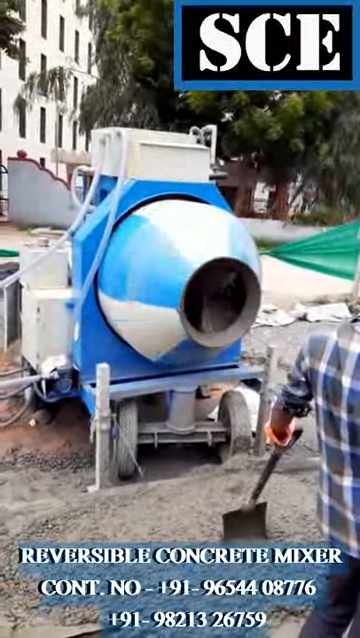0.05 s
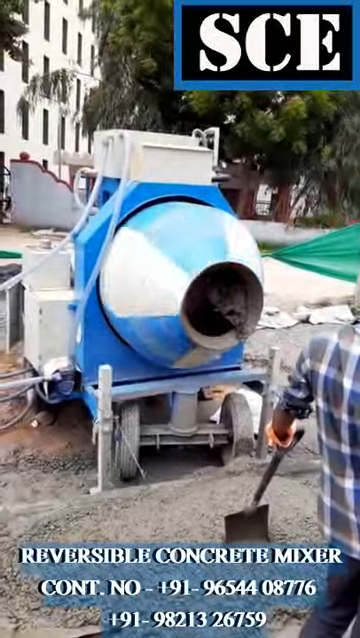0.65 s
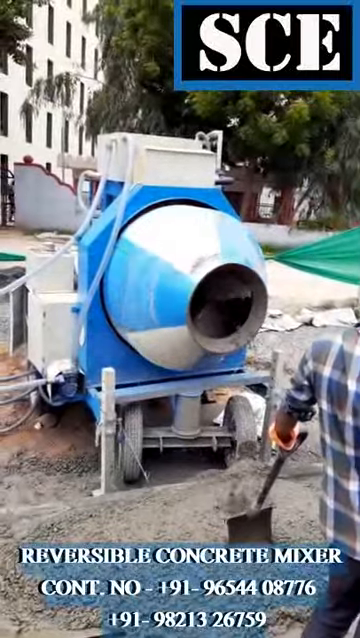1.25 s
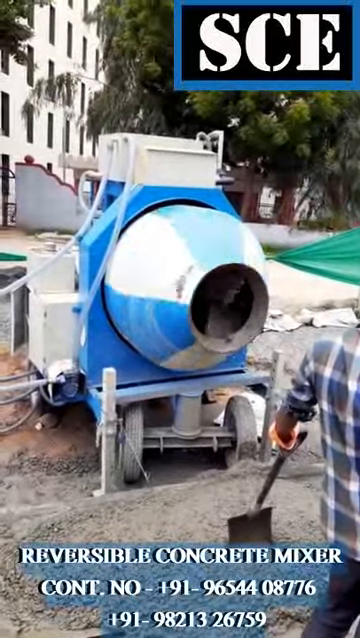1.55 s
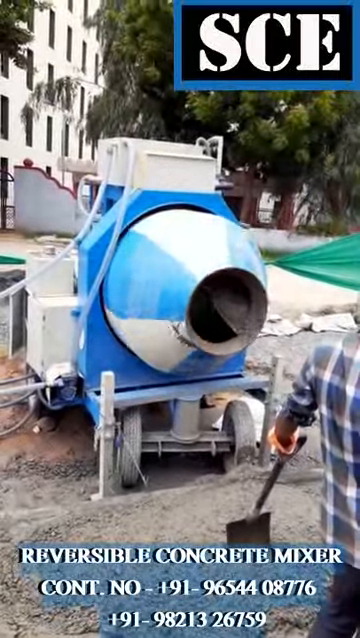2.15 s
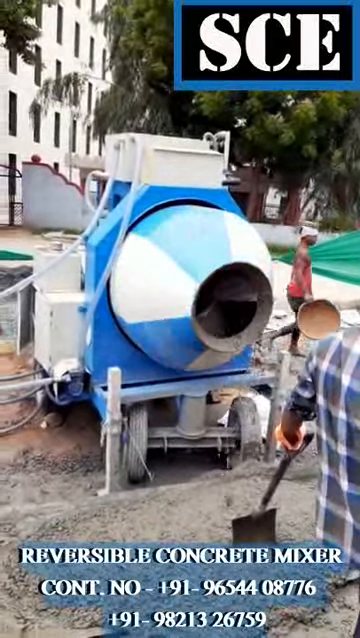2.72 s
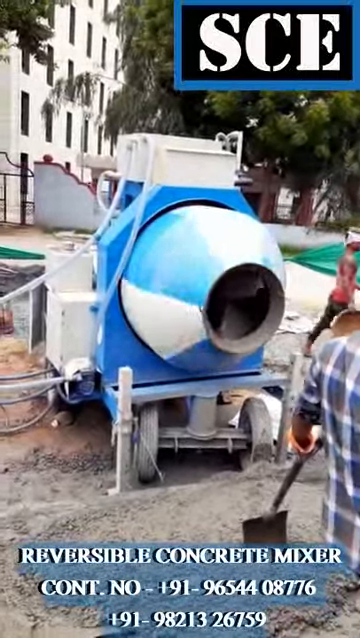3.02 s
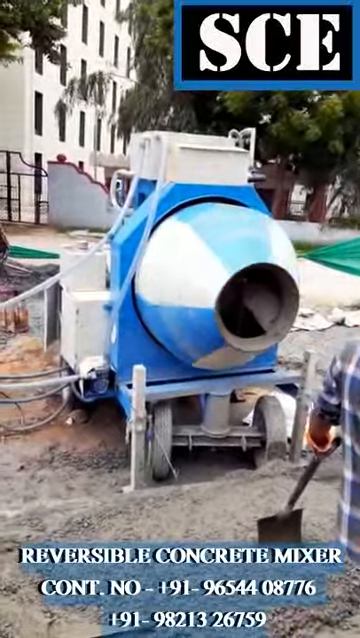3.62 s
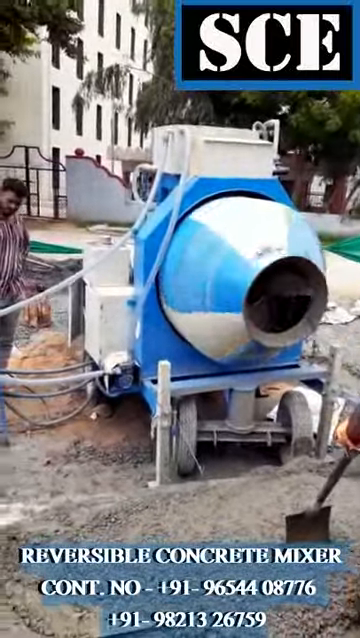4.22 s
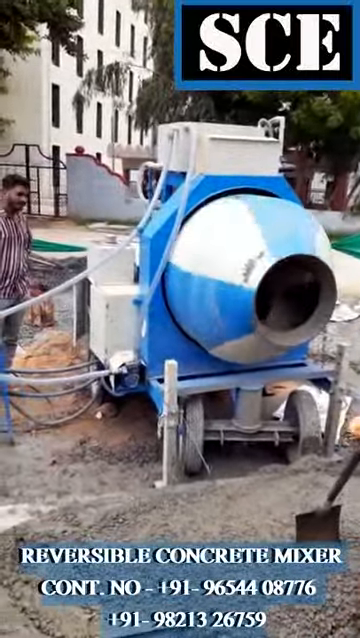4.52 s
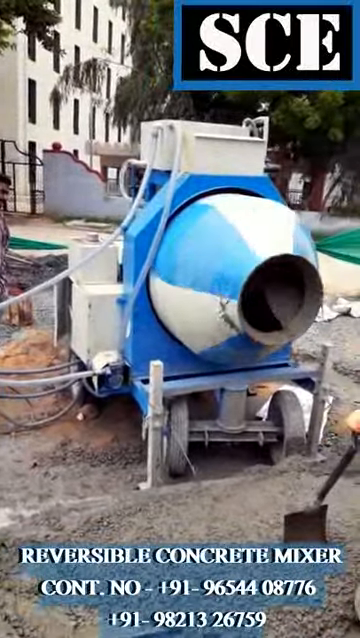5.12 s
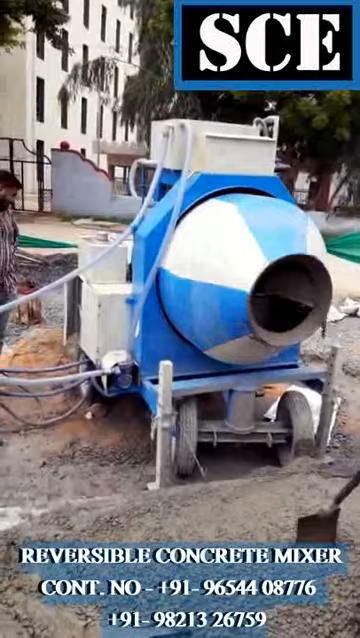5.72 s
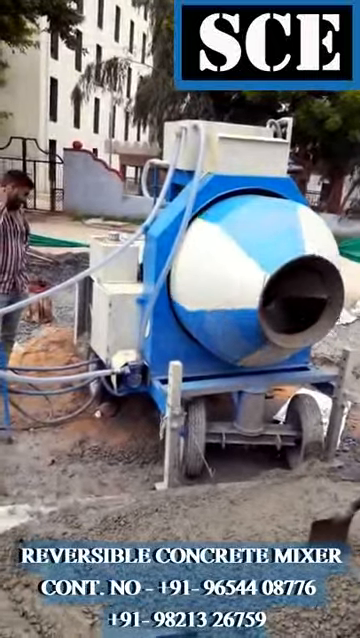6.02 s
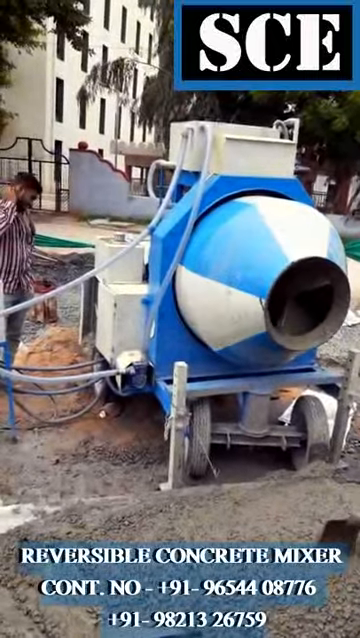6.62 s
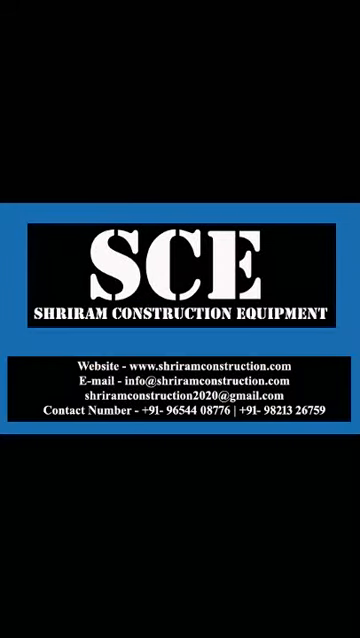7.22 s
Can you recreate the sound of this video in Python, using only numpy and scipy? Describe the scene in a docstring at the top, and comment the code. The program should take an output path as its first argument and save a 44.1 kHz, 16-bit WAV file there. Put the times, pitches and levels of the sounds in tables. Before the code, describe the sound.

A concrete mixer is already running close by outdoors, its one-cylinder diesel thudding, knocking and ticking in a fast, even rhythm. Wet gravel rumbles and slides in the steel drum, with frequent short rasps across the blades. The drum groans on a wavering low note, swelling most at about 2.4 and 4.5 seconds, and a roller gives faint, high squeaks. Stones patter over the rim around 1 second, repeatedly between 2.6 and 4.3, and again after 5, and the steel rings now and then. Dull thumps land near 0.5, 1.3 and 1.8 seconds, with the strongest knock at 3.4 and a sharp clink at 4. From about 5 seconds the tumbling eases and the engine knocks slightly harder. A shovel clacks and scrapes through gravel, most clearly at 5.9 and 6.5 seconds. Everything cuts off abruptly just before 6.9 seconds, leaving silence.

```python
"""A concrete mixer turns wet gravel in its steel drum on a building site.
The stones tumble, knock on the wall, slide off the blades and spill over the rim, making the steel ring.
A one-cylinder diesel drives it, thudding and ticking in every cycle. The drum groans on a wavering low
note that swells now and then, and a roller squeaks. Near the end a shovel scrapes through gravel nearby.
Everything cuts off shortly before seven seconds."""
import sys
import numpy as np
from scipy import signal
from scipy.fft import rfft, irfft, next_fast_len
from scipy.io import wavfile
from scipy.ndimage import map_coordinates

SR = 44100
rng = np.random.default_rng(int(sys.argv[2]) if len(sys.argv) > 2 else 0)


def to_wav(s):
    """Save 16-bit WAV."""
    ch = np.atleast_2d(s).T  # columns
    pcm = np.round(np.clip(ch, -1, 1) * 32767)  # PCM
    wavfile.write(sys.argv[1], SR, pcm.astype(np.int16))


N = 328986
TIME = np.arange(N) / SR


def amp(db):
    """Turn decibels into a number to multiply by."""
    return 10 ** (np.asarray(db) / 20)


def unit(x):
    """Scale a sound to an average (rms) strength of 1."""
    return x / np.sqrt(np.mean(x ** 2) + 1e-20)


def along(points, hz):
    """Read between the rows of a (pitch_hz, value) table, on a log scale of pitch."""
    pitches, values = np.transpose(points)
    return np.interp(np.log(hz + 1), np.log(pitches + 1), values)


def curve(points):
    """Join (time_s, value) rows with straight lines, one value per sample."""
    return np.interp(TIME, *np.transpose(points))


def wobble(rate):
    """A smooth curve through `rate` random values a second."""
    values = rng.standard_normal(int(N * rate / SR) + 4)
    coarse = TIME[::64]
    return np.interp(TIME, coarse, map_coordinates(values, [coarse * rate]))


def burst(age, attack_s, decay_s):
    """The loudness of a hit: a quick rise, then a dying away."""
    age = np.maximum(age, 0)
    return (1 - np.exp(-age / attack_s)) * np.exp(-age / decay_s) * (1 + 2 * attack_s / decay_s)


def swell(peak_s, half_length_s):
    """A smooth, bell-shaped rise and fall."""
    return np.exp(-((TIME - peak_s) / half_length_s) ** 2)


def batch(start_s, length_s, attack_s, release_s):
    """The loudness of a batch of stones: it builds, holds and peters out."""
    age = TIME - start_s
    return np.clip(age / attack_s, 0, 1) * np.exp(-np.maximum(age - length_s, 0) / release_s)


def filtered(x, response):
    """Multiply each frequency f in a sound by response(f)."""
    size = next_fast_len(N + SR // 4, True)
    return irfft(rfft(x, size) * response(np.fft.rfftfreq(size, 1 / SR)), size)[..., :N]


def colour(points):
    """A filter shape drawn from (pitch_hz, gain_db) rows."""
    return lambda f: amp(along(points, f))


def resonance(hz, width):
    """A filter shape that peaks at one pitch, applied twice for steep sides."""
    return lambda f: (1j * f * width / (hz * hz - f * f + 1j * f * width)) ** 2


def resonate(x, hz, sharpness):
    """Make a short noise ring around one pitch, at strength 1."""
    b, a = signal.iirpeak(hz, sharpness, SR)
    return unit(signal.lfilter(b, a, signal.lfilter(b, a, x)))


# How alike left and right are (1 = the same): pitch_hz, likeness
LIKENESS = [(60, 0.89), (200, 1), (400, 0.66), (700, 0.71), (1400, 0.36), (2200, 0.44), (4000, 0.17),
            (12000, 0.16)]
def spread(pair, response):
    """Turn two unrelated noises into filtered stereo of strength 1, most alike in the bass."""
    def shares(f):
        angle = np.arccos(np.clip(along(LIKENESS, f), -1, 1)) / 2
        return response(f) * np.array([np.cos(angle), np.sin(angle)])
    mid, side = filtered(pair, shares)
    return unit(np.array([mid + side, mid - side]))


def rush(response):
    """Smooth, filtered stereo noise of strength 1."""
    return spread(rng.standard_normal((2, N)), response)


def stones(per_s, scatter_db, decay_s):
    """Stones of uneven size hit at random moments, each a tiny burst of noise."""
    hits = (rng.random(N) < per_s / SR) * amp(scatter_db * np.minimum(rng.exponential(size=N), 3))
    power = signal.lfilter([1], [1, -np.exp(-2 / (decay_s * SR))], hits ** 2)
    return np.sqrt(power) * rng.standard_normal((2, N))


def steel(spacing_hz):
    """A bumpy filter shape: the drum rings at many pitches close together."""
    bumps_db = 2.3 * rng.standard_normal(size=1024)
    return lambda f: amp(np.interp(f / spacing_hz, np.arange(len(bumps_db)), bumps_db))


def on_steel(hits, tone, metal):
    """Give hits a tone colour and the ring of the metal, in stereo."""
    return spread(hits, lambda f: colour(tone)(f) * metal(f))


# Tone of the blade's clack, and of fine grit (also in spills): pitch_hz, gain_db
BLADE_TONE = [(500, -24.5), (1200, -11), (2000, -4.5), (3500, -15.5), (6000, -22), (9000, -12.5),
              (15000, -31.5)]
GRIT_TONE = [(3000, 1), (5500, 1), (7100, -3), (8500, 3), (10300, -1), (12300, -0.5), (15000, -14.5)]
# Shovel strokes: start_s, strike_db, scrape_db, length_s
SHOVEL_STROKES = [(5.302, -31, -47, 0.091), (5.91, -15, -30, 0.11), (6.464, -14, -25.5, 0.12),
                  (6.786, -28, -34, .05)]
def shovel():
    """The blade clacks on the gravel and grinds on through it."""
    strike, scrape = np.zeros((2, N))
    for start, strike_db, scrape_db, length in SHOVEL_STROKES:
        strike += amp(strike_db) * burst(TIME - start, attack_s=.0015, decay_s=.008)
        position = 2 * (TIME - start) / length - 1  # -1 to 1 during the stroke
        scrape += amp(scrape_db) * np.sqrt(np.clip(1 - position ** 2, 0, 1))
    clack = rush(colour(BLADE_TONE))
    grind = spread(stones(1300, 1.16, .0009), colour(GRIT_TONE))
    return strike * clack + scrape * grind


# Chirps of a roller: peak_s, level_db
ROLLER_CHIRPS = [(.34, -43), (.635, -35.5), (1.15, -38), (1.3, -40), (1.43, -40), (2.88, -35.5),
                 (3.62, -42), (4.41, -39), (5.40, -35), (5.775, -32.5), (5.925, -30.5), (6.115, -30)]
def roller(pitch_hz=8480, waver_hz=130, gain_db=1.5):
    """A roller whispers unevenly and gives a thin squeak now and then."""
    chirps = sum(amp(db + gain_db) * swell(peak, half_length_s=.016) for peak, db in ROLLER_CHIRPS)
    whisper = amp(-63 + 5.3 * wobble(18))
    pitch = pitch_hz + waver_hz * wobble(120)
    tone = np.sqrt(2) * np.sin(2 * np.pi * np.cumsum(pitch) / SR)
    return chirps * tone + whisper * rush(resonance(pitch_hz, 250))


def last_hit(cycle, speed, place):
    """For a hit at `place` (0 to 1) in each engine cycle: its number and the seconds since it."""
    count, fraction = np.divmod(cycle - place + 1, 1)
    return count.astype(int), fraction / speed


# Tones in the engine's hum: multiple_of_cycle_rate, level_db
ENGINE_HUM = [(6, -40.5), (7, -52), (8, -38), (9, -50), (10, -40), (13, -45), (15, -43), (27, -47),
              (29, -45), (35, -48), (38, -49), (69, -48)]
# Gusts of exhaust and intake: place_in_cycle, pitch_hz, level_db, decay_s
GAS_PUFFS = [(.14, 178, -20.5, .007), (.19, 207, -21, .008), (.535, 208, -30, .014),
             (.82, 186, -25.5, .011), (.885, 370, -27, .009), (.925, 328, -24, .008)]
def exhaust(cycle, speed, hum_db=-1, throb_place=.2, low_cut_hz=105):
    """The engine hums, and each gust of gas thuds in the pipes, never twice quite alike."""
    angle = 2 * np.pi * (cycle - throb_place)
    hum = sum(amp(db + hum_db + wobble(15)) * np.cos(multiple * angle) for multiple, db in ENGINE_HUM)
    puffs = np.zeros(N)
    for place, hz, db, decay in GAS_PUFFS:
        count, age = last_hit(cycle, speed, place)
        strength, detune = rng.standard_normal(size=(2, 128))[:, count]
        tone = np.sin(2 * np.pi * hz * (1 + .005 * detune) * age)
        puffs += amp(db + .7 * strength) * burst(age, .001, decay) * tone
    puffs = filtered(puffs, lambda f: 1 - 1 / (1 + (f / low_cut_hz) ** 8))
    return np.sqrt(2) * (puffs - hum)


# Metal notes rung in each cycle: place_in_cycle, pitch_hz, level_db, decay_s
KNOCK_NOTES = [(.31, 5400, -31.5, .0016), (.315, 4910, -27, .0023), (.316, 1090, -26.5, .0065),
               (.316, 1240, -26, .0065), (.315, 1160, -25, .0025), (.318, 1370, -30, .004),
               (.37, 825, -30.5, .014), (.56, 860, -30, .008), (.2, 677, -35.5, .032),
               (.125, 5100, -39, .002)]
def knock(cycle, speed):
    """The fuel injector pings and the engine block knocks at every firing."""
    out = np.zeros((2, N))
    for place, hz, db, decay in KNOCK_NOTES:
        count, age = last_hit(cycle, speed, place)
        strength, detune, shift, skew = rng.standard_normal(size=(4, 128))[:, count]
        phase = .4 * shift + np.array([skew, -skew]) / 3  # not the same left and right
        ring = np.sqrt(2) * np.sin(2 * np.pi * hz * (1 + .006 * detune) * age + phase)
        out += amp(db + .6 * strength) * burst(age, .0005, decay) * ring
    return out


# Ticks of valves and rattling covers: place_in_cycle, pitch_hz, base_width_hz, level_db, decay_s
VALVE_TICKS = [(.39, 870, 400, -35, .014), (.559, 832, 250, -33.5, 0.0084), (.6, 5140, 1990, -32.5, 0.013),
               (.72, 4547, 2200, -32.5, .0081), (.83, 13000, 2507, -34, .007), (.97, 8800, 2000, -36, .012),
               (.125, 13000, 2990, -37.5, .004), (.62, 10500, 4000, -36, .016)]
def clatter(cycle, speed, scatter_db=2):
    """Each moving part strikes at its own place in the cycle, harder or softer every time."""
    out = np.zeros((2, N))
    for place, hz, width, db, decay in VALVE_TICKS:
        count, age = last_hit(cycle, speed, place)
        strength_db = scatter_db * rng.standard_normal(size=128)[count]
        out += amp(db + strength_db) * burst(age, .00027, decay) * rush(resonance(hz, 1.16 * width))
    return out


# Speed of the four-stroke engine: time_s, cycles_per_s
ENGINE_SPEED = [(0, 11.67), (1.7, 11.66), (3, 11.68), (4.9, 11.67), (5.3, 11.72), (5.8, 11.85),
                (6.2, 11.95), (6.9, 12.0)]
# The knock grows louder near the end, and the clatter more so: time_s, boost_db
KNOCK_BOOST = [(0, 0), (5.2, 0), (6.1, 1.4), (6.9, 1.7)]
# Tone of the fan and engine block: pitch_hz, gain_db
FAN_TONE = [(20, -61.5), (45, -29), (65, -10.5), (130, -12), (260, -6.5), (370, -16), (500, -11), (700, -7),
            (1200, -11.5), (2000, -16), (3000, -22), (5200, -17), (7000, -31.5), (8500, -21.5),
            (10300, -27.5), (12500, -25), (15000, -35.5)]
def engine():
    """The diesel thuds, knocks and ticks in step, over the steady rush of its fan and block."""
    speed = curve(ENGINE_SPEED)
    boost_db = curve(KNOCK_BOOST)
    cycle = np.cumsum(speed) / SR  # cycles run so far
    fan = amp(-29 + .87 * wobble(11)) * rush(colour(FAN_TONE))
    thuds = exhaust(cycle, speed)
    knocks = amp(boost_db) * knock(cycle, speed)
    ticks = amp(1.42 * boost_db) * clatter(cycle, speed)
    return fan + thuds + knocks + ticks


# Low notes of the rubbed drum: peak_s, level_db, pitch_hz, half_length_s
DRUM_HUMS = [(.27, -31, 371, .1), (.53, -31.5, 364, 0.18), (.69, -34, 147, .1), (1.397, -32.5, 390, 0.063),
             (2.0, -34, 150, .049), (3.737, -31, 149.5, .06), (4.37, -32, 147.6, 0.14),
             (4.92, -36, 370, .08)]
def hums():
    """The sliding load rubs the drum like a bow, so a low note swells and fades."""
    drift = .31 * wobble(20)
    out = np.zeros(N)
    for peak, db, hz, half_length in DRUM_HUMS:
        out += amp(db) * swell(peak, half_length) * np.sin(2 * np.pi * hz * (TIME - peak) + drift)
    return np.sqrt(2) * out


# One stone on the rim: start_s, level_db, pitch_hz
RIM_CLINKS = [(3.956, -19.5, 3870)]
def clinks(width_hz=1100, decay_s=.018):
    """A stone hits the steel rim, which rings briefly."""
    return sum(amp(db) * burst(TIME - start, .001, decay_s) * rush(resonance(hz, width_hz))
               for start, db, hz in RIM_CLINKS)


# Tone of pattering stones: pitch_hz, gain_db
PATTER_TONE = [(800, -13.5), (2000, 3), (2900, -4), (3550, 3), (3800, -2), (4400, -1), (5500, -19),
               (7000, -21.5), (14000, -49.5)]
# Stones spilling out: start_s, length_s, patter_db, hiss_db
STONE_SPILLS = [(0.95, 0.37, -29, -32), (1.157, 0.13, -31, -31.5), (2.584, 0.069, -28, -41),
                (2.76, 0.14, -31, -32.5), (3.315, 0.044, -23, -33.5), (3.92, 0.15, -32, -35),
                (4.075, 0.079, -25.5, -31.5), (4.28, 0.069, -28, -41.5), (5.283, 0.039, -27.5, -33.5),
                (5.779, 0.23, -32.5, -31.5)]
def spills(trickle_patter_db=-36, trickle_hiss_db=-35.5):
    """Loose stones patter over the drum's mouth: a constant trickle and larger portions."""
    patter_power, hiss_power = amp(trickle_patter_db) ** 2, amp(trickle_hiss_db) ** 2
    for start, length, patter_db, hiss_db in STONE_SPILLS:
        flow = batch(start, length, attack_s=.018, release_s=.11)
        patter_power += (amp(patter_db) * flow) ** 2
        hiss_power += (amp(hiss_db) * flow) ** 2
    clumps_db = 3 * wobble(22.08)
    metal = steel(spacing_hz=59.87)
    patter = amp(clumps_db / 2) * on_steel(stones(700, 2.6, .006), PATTER_TONE, metal)
    hiss = amp(clumps_db) * on_steel(stones(600, .94, .011), GRIT_TONE, metal)
    return np.sqrt(patter_power) * patter + np.sqrt(hiss_power) * hiss


# Moments when the steel rings: peak_s, level_db, pitch_hz, half_length_s
STEEL_RINGS = [(0.982, -22, 866, 0.013), (2.86, -28, 900, .08), (2.967, -27.5, 990, 0.14),
               (5.14, -28.5, 978, 0.091), (5.623, -25.5, 1050, 0.05), (5.96, -29.5, 940, .04)]
def rings(sharpness=11):
    """Stones rolling on the steel make it ring around one pitch."""
    out = np.zeros((2, N))
    grit = spread(stones(710, 1.9, .0027), np.ones_like)
    for peak, db, hz, half_length in STEEL_RINGS:
        near = slice(max(round((peak - 3 * half_length) * SR), 0), round((peak + 3 * half_length) * SR))
        out[:, near] += amp(db) * swell(peak, half_length)[near] * resonate(grit[:, near], hz, sharpness)
    return out


# Tone of rasping stones: pitch_hz, gain_db
RASP_TONE = [(800, -24.5), (1500, -2.5), (2400, -1.5), (2750, -16.5), (5000, -34.5)]
# Stones dragging over a mixing blade: start_s, length_s, level_db, pitch_hz
BLADE_SCRAPES = [(0.103, 0.032, -25.5, 2080), (0.284, 0.15, -26.5, 1980), (0.533, .025, -23.5, 2060),
                 (.6, 0.037, -27, 2000), (0.743, .045, -22.5, 2150), (1.0, .035, -23, 2100),
                 (1.09, 0.036, -25, 2000), (1.17, .05, -23, 1950), (1.366, 0.041, -20, 2150),
                 (1.43, .06, -23, 2250), (1.52, .04, -23.5, 2050), (1.602, .09, -24.5, 2030),
                 (2.315, 0.048, -26.5, 2000), (2.42, .015, -23.5, 1900), (2.468, 0.044, -21.5, 2100),
                 (2.639, 0.035, -19, 1950), (2.754, .055, -19.5, 2150), (2.858, 0.083, -25.5, 1950),
                 (3.02, 0.051, -24.5, 2000), (3.18, 0.062, -24.5, 2050), (3.384, 0.083, -25.5, 2000),
                 (3.481, .035, -23, 1950), (4.05, 0.049, -26, 2000), (4.32, 0.043, -22.5, 1900),
                 (4.432, 0.057, -23, 2200), (4.499, 0.035, -21, 2280), (4.702, 0.047, -24, 2100),
                 (4.797, 0.049, -22, 1870), (4.88, .08, -26, 2000), (5.092, 0.058, -27.5, 2000),
                 (5.632, 0.055, -29, 1900), (5.932, 0.049, -22.5, 1800)]
def scrapes(sharpness=4.1, gain_db=-.5):
    """Stones catch on a blade, judder across it with a rasp and let go."""
    out = np.zeros((2, N))
    grit = spread(stones(650, 1.3, .0035), colour(RASP_TONE))
    for start, length, db, hz in BLADE_SCRAPES:
        near = slice(round(start * SR), round((start + length) * SR) + SR // 10)
        loudness = amp(db + gain_db) * batch(start, length, attack_s=.0079, release_s=.022)
        out[:, near] += loudness[near] * resonate(grit[:, near], hz, sharpness)
    return out


# Notes of the struck drum wall: pitch_hz, level_db, decay_s
WALL_NOTES = [(205, -7, .005), (280, -1.5, .011), (367, -12.5, .004), (550, -11, .008), (665, -10, .011)]
# Heavy lumps falling: start_s, boom_db, boom_hz, knock_db
FALLING_LUMPS = [(0.526, -16.5, 109, -23), (1.261, -16, 147, -33), (1.774, -17, 157, -28),
                 (3.415, -14, 120, -10), (6.787, -23, 147.8, -26.5)]
def lumps(low_cut_hz=60):
    """A heavy lump lands: the wall knocks and the loaded drum gives a short, dull boom."""
    out = np.zeros(N)
    age = np.arange(SR // 5) / SR
    wall = sum(amp(db) * burst(age, .001, decay) * np.sin(2 * np.pi * hz * age)
               for hz, db, decay in WALL_NOTES)
    for start, boom_db, hz, knock_db in FALLING_LUMPS:
        boom = burst(age, attack_s=.0054, decay_s=.0087) * np.sin(2 * np.pi * hz * age)
        out[round(start * SR):][:len(age)] += np.sqrt(2) * (amp(boom_db) * boom + amp(knock_db) * wall)
    return filtered(out, lambda f: f ** 4 / (f ** 4 + low_cut_hz ** 4))


# The note the drum groans on: time_s, pitch_hz
GROAN_NOTE = [(0, 276.5), (1.2, 274.4), (2.1, 276), (2.42, 270), (2.85, 277.4), (4.58, 278.6),
              (4.72, 290.2), (4.9, 278.6), (5.9, 277.8), (6.08, 305)]
# Moments when the groan swells: peak_s, level_db, half_length_s
GROAN_SWELLS = [(0.413, -29, 0.075), (.9, -31.5, 0.21), (1.157, -24, 0.056), (1.46, -26, 0.033),
                (1.958, -23.5, 0.061), (2.085, -23, 0.031), (2.433, -20.5, 0.076), (2.82, -24, 0.06),
                (3.098, -26, 0.053), (3.27, -26, 0.046), (3.425, -23.5, 0.032), (4.525, -18.5, 0.071),
                (4.66, -25, 0.13), (5.013, -25.5, 0.18), (5.288, -28, 0.044), (5.701, -30.5, 0.44),
                (6.045, -30.5, 0.056)]
def groan(load_db, gain_db=-2, overtone_db=-17, waver_radians=.38):
    """The drum groans on a wavering low note that swells now and then."""
    steady = amp(load_db - 6)
    swell_power = sum((amp(db) * swell(peak, half_length)) ** 2 for peak, db, half_length in GROAN_SWELLS)
    loudness = np.sqrt(steady ** 2 + swell_power)
    phase = 2 * np.pi * np.cumsum(curve(GROAN_NOTE)) / SR + waver_radians * wobble(22)
    tone = np.sqrt(2) * (np.sin(phase) + amp(overtone_db) * np.sin(3 * phase))
    return loudness * amp(gain_db + 1.2 * wobble(25)) * tone


# Tone of the rumble, the knocks on the wall and the sliding: pitch_hz, gain_db
RUMBLE_TONE = [(25, -66), (50, -45), (100, -16.5), (130, -2), (150, 6), (180, -3.5), (240, 2), (305, 0),
               (340, 1), (380, 0), (480, -8.5), (800, -41)]
WALL_TONE = [(300, -51), (500, -13.5), (650, -0.5), (830, 1), (930, 0), (1080, 1), (1400, -8), (2000, -4),
             (2800, -33), (5000, -51)]
SLIDE_TONE = [(900, -33.5), (1400, -9), (1750, -5), (2050, -3.5), (2300, -6), (2600, -14), (3200, -17.5),
              (6000, -33)]
# Batches of gravel leaving the blades: start_s, length_s, level_db
GRAVEL_SLIDES = [(0, 0.66, -25.5), (0.726, 0.12, -26), (0.97, 0.27, -24), (1.321, 0.23, -25),
                 (1.59, 0.26, -26), (2.29, 0.25, -25), (2.63, 0.26, -24.5), (2.97, 0.4, -26.5),
                 (3.332, 0.27, -25.5), (3.637, 0.12, -25), (3.854, 0.088, -24), (3.996, 0.2, -24.5),
                 (4.29, .28, -25.5), (4.713, 0.293, -24), (5.1, 0.069, -26.5), (5.305, 0.11, -27.5),
                 (5.53, 0.13, -26.5), (5.772, 0.071, -26), (5.923, 0.11, -27)]
def drum(load_db):
    """Wet gravel rumbles, knocks on the wall and slides all the time, with louder batches on top."""
    batches = np.sqrt(sum((amp(db) * batch(start, length, attack_s=.0054, release_s=.044)) ** 2
                          for start, length, db in GRAVEL_SLIDES))
    metal = steel(spacing_hz=28)
    rumble = amp(load_db - 1.47 + 1.5 * wobble(8)) * rush(colour(RUMBLE_TONE))
    knock_level = np.hypot(amp(load_db + 1), batches) * amp(-4)
    knocks = on_steel(stones(per_s=900, scatter_db=2.5, decay_s=.0049), WALL_TONE, metal)
    slide_level = np.hypot(amp(load_db - 1.5), batches) * amp(-2 + 2 * wobble(22.01))
    slides = on_steel(stones(per_s=900, scatter_db=1.9, decay_s=.0076), SLIDE_TONE, metal)
    return rumble + knock_level * knocks + slide_level * slides


# How loudly the load tumbles; the groan follows it too: time_s, level_db
LOAD_LEVEL = [(0, -25.5), (.8, -28), (1.4, -27), (2.2, -25), (2.8, -26), (3.3, -27), (3.9, -25.5),
              (4.5, -27.5), (5.1, -29.5), (5.8, -30), (6.15, -32), (6.7, -34), (6.82, -30)]
# How much louder the left side is: pitch_hz, left_minus_right_db
LEFT_LOUDER = [(60, -1), (110, -1), (200, -1.5), (380, -2.5), (700, 2.5), (1290, -5.5), (2380, -4.5),
               (4400, -4), (8120, -0.5), (15000, 2)]
# How far ahead the left side is: pitch_hz, lead_radians
LEFT_LEAD = [(60, 0), (700, .15), (1700, .4), (2800, 2.6), (5000, 5.1), (8500, 7.9), (15000, 15)]
def scene():
    """Mixer and shovel together, reaching the left ear a little earlier and with a different tone."""
    load_db = curve(LOAD_LEVEL)
    site = engine() + groan(load_db) + drum(load_db)
    site += scrapes() + rings() + hums() + spills() + clinks() + lumps() + roller() + shovel()
    sides = np.array([[.5], [-.5]])
    def placement(f):
        return amp(sides * along(LEFT_LOUDER, f)) * np.exp(1j * sides * along(LEFT_LEAD, f))
    return filtered(site, placement)


def record(dry, cut_s=6.862, top_hz=15150):
    """Stop the sound abruptly and remove the very highest treble."""
    fade_db = np.interp(TIME - cut_s, [0, .003, .02, .035], [-.5, -14, -34.5, -140])
    return filtered(dry * amp(fade_db), lambda f: 1 / (1 + (f / top_hz) ** 200))


dry = scene()
out = record(dry)
to_wav(out)
```